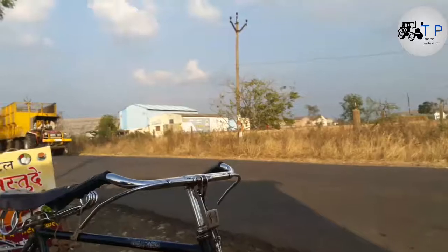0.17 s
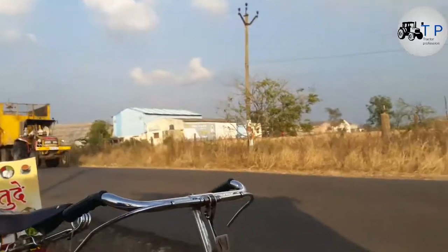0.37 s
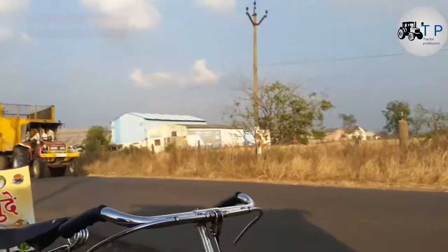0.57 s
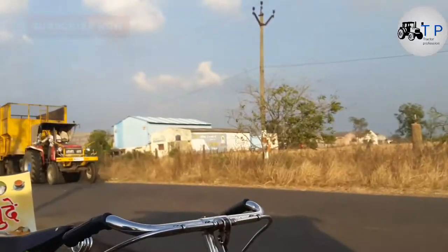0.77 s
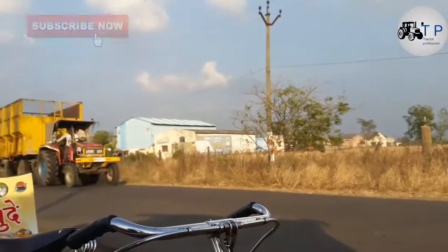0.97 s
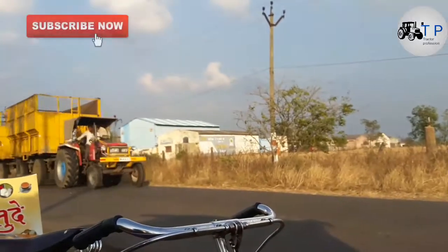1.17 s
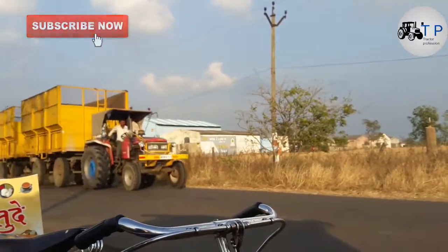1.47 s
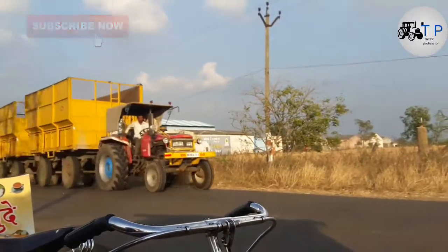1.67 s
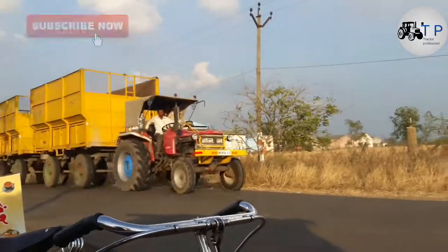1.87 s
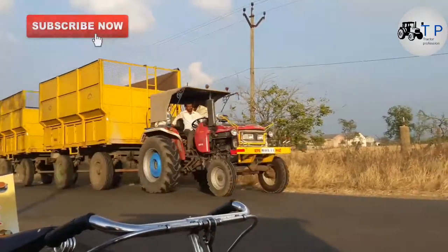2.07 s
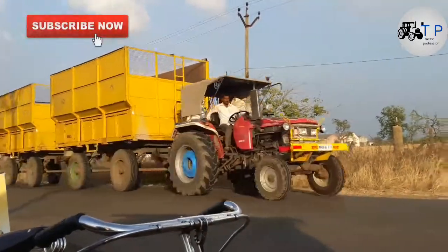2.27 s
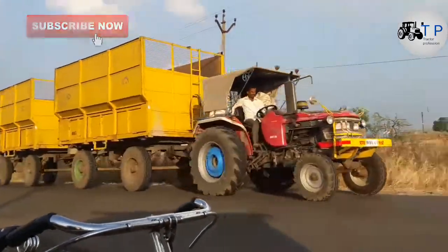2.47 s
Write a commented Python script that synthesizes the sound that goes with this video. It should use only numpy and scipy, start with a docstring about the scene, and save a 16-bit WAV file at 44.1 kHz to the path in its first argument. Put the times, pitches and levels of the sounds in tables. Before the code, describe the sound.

A tractor hauls trailers closer along a paved road, engine and tyres growing louder. A small puttering engine fades out first; a distant horn and a few sharp engine knocks follow, while wind puffs against the roadside microphone.

```python
"""Tractor approaching on a paved road

A diesel tractor hauls heavy trailers closer: rumble, tyre roar, rasp and hiss chug with its firings,
swelling and brightening over exhaust harmonics and a gear whine. A small single-cylinder engine
putters away, valves ticking. Sharp engine knocks ring a metal part, a horn sounds farther off and wind
puffs on the two ports of a roadside microphone. It all fades in after a short silence."""
import sys
import numpy as np
from scipy import signal
from scipy.io import wavfile
from scipy.ndimage import uniform_filter1d

SR = 44100
rng = np.random.default_rng(int(sys.argv[2]) if len(sys.argv) > 2 else 0)


def log_audio(samples):
    """Write samples as a 16-bit WAV file to the path given in sys.argv[1]."""
    # one column per channel
    frames = np.atleast_2d(samples).T
    # limit to full scale, then quantise
    limited = np.clip(frames, -1, 1)
    pcm = np.round(limited * 32767).astype(np.int16)
    wavfile.write(sys.argv[1], SR, pcm)


N = 115542

# Faders for the tractor's approach: time_s, rumble_db, roar_db, rasp_db, hiss_db
APPROACH = [(.25, -23, -26.5, -42.5, -42), (.45, -22.5, -27, -43.5, -43), (.62, -22.5, -26, -46, -44),
            (.8, -22, -26.5, -38, -42.5), (.95, -22, -24, -36.5, -40), (1.1, -30, -23.5, -33.5, -38.5),
            (1.25, -21.5, -22.5, -31, -38.5), (1.4, -23, -22.5, -31, -38), (1.55, -23.5, -20.5, -29, -36.5),
            (1.7, -21.5, -22, -29, -37), (1.82, -21.5, -20, -29.5, -37), (1.95, -19, -21, -30, -37.5),
            (2.05, -23, -19.5, -30, -35.5), (2.18, -18.5, -19.5, -27.5, -37),
            (2.32, -19.5, -20, -28.5, -35.5), (2.47, -22, -20, -29, -35), (2.62, -22.5, -19, -31.5, -35.5)]
# EQ curves of its four noise beds (the roar is tyres and engine casing): frequency_hz, gain_db
RUMBLE_EQ = [(15, -56), (25, -42), (48, -15), (60, -6.5), (91, -3), (119, 3), (246, 1), (275, -3),
             (340, -8.5), (450, -12.5), (700, -36), (1500, -120)]
ROAR_EQ = [(210, -26), (350, -8), (450, -4), (626, -2), (860, -1), (910, -6), (980, -5.5), (1050, -6),
           (1190, -2.5), (1420, -4), (1860, -3), (2250, -5), (2660, -5), (3300, -16), (4290, -48),
           (7260, -120)]
RASP_EQ = [(1760, -43), (3000, -1.5), (3280, -1.5), (3590, 0.5), (4310, -6.5), (4980, -7.5), (6300, -16),
           (8190, -23), (13900, -120)]
HISS_EQ = [(3530, -7), (6000, -1), (6980, -3), (8060, 0), (9420, -9.5), (12400, -8.5), (14800, -13.5),
           (15400, -15), (15600, -26)]
# Resonances of the engine casing: pitch_hz, width_hz, gain_db
CASING_MODES = [(1050, 50, -4), (1135, 60, 0), (1200, 60, -.5), (1270, 50, -4), (1575, 60, -6),
                (1830, 90, -5), (1910, 70, -6), (2080, 40, -6), (2700, 50, -7)]
# Casing ring against the roar, rising as the engine nears: time_s, gain_db
CASING_FADER = [(.5, -18), (1.3, -8), (2.1, -6.5), (2.6, -6)]
# Engine tones (exhaust harmonics of the crank, plus one gear whine near 450 Hz),
# before they ride the rumble fader: crank_multiple, level_db
ENGINE_TONES = [(2, -41), (4, -33.5), (5, -39), (6, -36.5), (9, -37.5), (10, -37), (14.3, -43.5), (18, -46),
                (20, -52), (22, -41), (36, -43.5)]
# The small engine driving away: time_s, gain_db
SMALL_FADER = [(.12, 0), (.33, 1), (.5, -1.5), (.7, -3.5), (.95, -9), (1.2, -26)]
# Tone of its exhaust pipe: frequency_hz, gain_db
SMALL_PIPE_EQ = [(30, -35), (70, -21), (110, 2), (180, -3), (350, 2.5), (500, -2), (750, -15), (1000, -12)]
# Resonances of its valves: pitch_hz, width_hz, gain_db
VALVE_MODES = [(4070, 870, 5), (4720, 1200, 6), (5500, 800, -3), (6640, 530, -4), (7540, 590, -3.5),
               (10700, 2200, -5)]
# Its loudest valve ticks: start_s, level_db, pitch_hz
VALVE_ACCENTS = [(.183, -33, 6000), (.2104, -34, 4800), (.2673, -32, 6700), (.2937, -34, 6700),
                 (.349, -35, 7000), (.3795, -31, 7600), (.406, -31, 7700), (.4334, -32, 7500),
                 (.4888, -32, 5300), (.5174, -34, 5200), (.5447, -35, 7700), (.6, -35, 6600)]
# Sharp engine knocks: start_s, strength_db
KNOCK_HITS = [(.7916, -33), (.9679, -31), (1.0494, -35), (1.4149, -32), (1.6077, -34), (1.625, -29),
              (1.6404, -33), (2.281, -32), (2.435, -32)]
# The small metal part they ring: pitch_hz, width_hz, gain_db
KNOCK_MODES = [(8370, 300, 11.5), (6600, 800, -32)]
# Faders for the horn's overtones: time_s, lower_db, upper_db
HORN_FADERS = [(.95, -37.5, -43), (1.005, -29, -41), (1.095, -29, -40.5), (1.125, -38, -34),
               (1.17, -36, -37), (1.23, -38, -47), (1.28, -35.5, -41), (1.4, -35, -36), (1.45, -39, -37),
               (1.53, -41, -43), (1.585, -39, -34), (1.63, -31, -29.5), (1.675, -34, -38)]
# Bell-shaped wind puffs: centre_s, level_db, width_s
WIND_PUFFS = [(1.018, -31, 0.044), (1.718, -27, 0.023), (2.11, -30, 0.019), (2.38, -27, 0.021),
              (2.456, -23, 0.027), (2.61, -27, 0.024)]
# Colour difference between the microphone ports: frequency_hz, left_minus_right_db
PORT_BALANCE = [(60, 2), (300, 1), (2000, -0.5), (3200, -1), (4300, -4.5), (5200, -7), (6300, -1),
                (7600, 0.5), (8800, 7), (11500, 9.5), (12700, 3), (15000, 7)]
# Phase difference between the ports: frequency_hz, left_lag_rad
PORT_PHASE_LAG = [(100, 0), (4200, 0), (6000, -1.8), (15000, -1.6)]
# Base left-right likeness of the noise beds: frequency_hz, likeness_ratio
PORT_LIKENESS = [(60, 0.99), (250, 1), (600, 0.87), (1500, 0.53), (2600, 0.31), (4500, 0.56), (7000, 0.27),
                 (9000, .15), (15000, 0.091)]

CRANK_HZ, SMALL_FIRING_HZ = 31.53, 35.64
LAG_START_SAMPLES, LAG_SAMPLES_PER_S = -10.2, 4.9  # left behind right, as the tractor crosses


def amp(db):
    """Decibels to linear gain."""
    return 10 ** (np.asarray(db) / 20)


def unit_rms(x):
    """Normalises to an rms of 1."""
    return x / np.sqrt(np.mean(x ** 2) + 1e-20)


def at_hz(points, hz):
    """Reads a curve along a log-frequency axis."""
    frequencies, values = np.transpose(points)
    return np.interp(np.log(hz + 1), np.log(frequencies + 1), values)


def fader(table, t, column=1):
    """Linear gain gliding between timed decibel points."""
    points = np.array(table)
    return amp(np.interp(t, points[:, 0], points[:, column]))


def drift(rate_hz):
    """Random wander of rms 1."""
    return unit_rms(np.interp(np.arange(N) / SR * rate_hz, np.arange(200), rng.standard_normal(200)))


def ring(x, modes):
    """Plays x through parallel resonators."""
    return sum(amp(db) * signal.lfilter(*signal.iirpeak(hz, hz / width, SR), x)
               for hz, width, db in modes)


def firings(rate_hz, first_s, decay_s, spread_db):
    """One decaying envelope per firing, each of uneven strength."""
    cycles = (np.arange(N) / SR - first_s) * rate_hz + 1
    strength = amp(spread_db * rng.standard_normal(400))[cycles.astype(int)]
    return strength * np.exp(-(cycles % 1) / rate_hz / decay_s)


def mic_ports(left, right, hz, lag_samples, tilt_db=0.):
    """Two spectrograms to stereo: direction delays one side, and each port has its own colour."""
    treble_tilt = tilt_db * np.clip(hz / 9000, 0, 1) ** 2  # cuts the left, lifts the right
    balance = amp(at_hz(PORT_BALANCE, hz) / 2 - treble_tilt)[:, None]
    phase = 2 * np.pi * hz[:, None] * lag_samples / SR + at_hz(PORT_PHASE_LAG, hz)[:, None]
    pair = np.array([left * balance * np.exp(-1j * phase), right / balance])
    return signal.istft(pair, nperseg=512, noverlap=384)[1][:, :N]


def pan(x, tilt_db=0., lag_samples=None):
    """Places a point source, by default on the tractor; reflections make its stereo phase wander."""
    hz, t, spectrogram = signal.stft(x, SR, nperseg=512, noverlap=384)
    wander_rad = .5 * np.interp(t * SR, np.arange(N), drift(6.2))
    if lag_samples is None:
        lag_samples = LAG_START_SAMPLES + LAG_SAMPLES_PER_S * t
    return mic_ports(spectrogram * np.exp(1j * wander_rad), spectrogram, hz, lag_samples, tilt_db)


def noise_bed(patchy_db, eq=None, modes=()):
    """Patchy noise shaped by an EQ or by resonances; the sides grow alike as the tractor nears."""
    frames, hz = N // 128 + 5, np.fft.rfftfreq(512, 1 / SR)
    t = np.arange(frames) * 128 / SR
    re_left, im_left, re_other, im_other, patches = rng.standard_normal((frames, 257, 5)).T
    patches = uniform_filter1d(uniform_filter1d(patches, 6, 0), 20, 1)
    gain = amp(patchy_db * unit_rms(patches))
    likeness = np.clip(at_hz(PORT_LIKENESS, hz), 0, 1)[:, None] ** (1.55 - .48 * t)
    left = re_left + 1j * im_left
    right = likeness * left + np.sqrt(1 - likeness ** 2) * (re_other + 1j * im_other)
    bed = mic_ports(left * gain, right * gain, hz, LAG_START_SAMPLES + LAG_SAMPLES_PER_S * t)
    bins_hz = np.fft.rfftfreq(N, 1 / SR)
    if modes:
        colour = sum(amp(db) / (1 + ((bins_hz - pitch) / width * 2) ** 2) for pitch, width, db in modes)
    else:
        colour = amp(at_hz(eq, bins_hz))
    bed = np.fft.irfft(np.fft.rfft(bed) * colour, N)
    return bed / np.sqrt(np.mean(bed.mean(0) ** 2))


def tractor(t):
    """Noise beds chug at two firings a turn, over exhaust harmonics of the crank and a gear whine."""
    chug = unit_rms(firings(2 * CRANK_HZ, first_s=.0095, decay_s=.005, spread_db=5.))
    rumble_gain, roar_gain, rasp_gain, hiss_gain = (fader(APPROACH, t, k) for k in range(1, 5))
    turns = np.cumsum(CRANK_HZ * (1 + .002884 * drift(3.97))) / SR
    tones = sum(amp(db + 4.5 * drift(9.27)) * np.sin(2 * np.pi * (k * turns + rng.random()))
                for k, db in ENGINE_TONES)
    rumble = noise_bed(patchy_db=-1., eq=RUMBLE_EQ)
    roar = noise_bed(patchy_db=.74, eq=ROAR_EQ)
    casing = fader(CASING_FADER, t) * noise_bed(patchy_db=1.9, modes=CASING_MODES)
    rasp = noise_bed(patchy_db=2., eq=RASP_EQ)
    hiss = noise_bed(patchy_db=1.5, eq=HISS_EQ)
    return (rumble_gain * (.84 + .1 * chug) * rumble
            + roar_gain * (.85 + .1 * chug) * (roar + casing)
            + rasp_gain * (.85 + .1 * chug) * rasp
            + hiss_gain * (.91 + .25 * chug) * hiss
            + pan(np.sqrt(2) * tones * rumble_gain / rumble_gain.mean()))


def small_engine(t):
    """One cylinder putters off: exhaust beats, a valve tick on each firing and an even clatter."""
    first_s, accent_decay_s = .018, .0025
    cycles = SMALL_FIRING_HZ * (t - first_s)
    putter = 0
    for k in range(1, 28):
        gain = amp(at_hz(SMALL_PIPE_EQ, k * SMALL_FIRING_HZ) + 3.6 * drift(13.8))
        putter += gain * np.cos(2 * np.pi * k * cycles - .15 * k * k)  # staggered phases smear the beat
    bursts = firings(SMALL_FIRING_HZ, first_s, decay_s=.0023, spread_db=1.5)
    ticks = unit_rms(ring(bursts * rng.standard_normal(N), VALVE_MODES))
    clatter = unit_rms(ring(rng.standard_normal(N), VALVE_MODES))
    engine = amp(-27) * unit_rms(putter) + amp(-45) * ticks + amp(-42) * clatter
    accents = 0
    for start_s, db, hz in VALVE_ACCENTS:
        age = t - start_s
        accents += (age > 0) * amp(db) * np.exp(-abs(age) / accent_decay_s) * np.sin(2 * np.pi * hz * age)
    return pan(engine * fader(SMALL_FADER, t) + accents, tilt_db=10.5, lag_samples=9.5)


def swell(t, centre_s, width_s):
    """Bell-shaped envelope peaking at 1."""
    return np.exp(-.5 * ((t - centre_s) / width_s) ** 2)


def knocks(t):
    """Single clicks ring a small metal part, which squeaks once."""
    clicks = np.zeros(N)
    for start_s, db in KNOCK_HITS:
        clicks[round(start_s * SR)] = 20 * amp(db)
    squeak_hz, width_hz = 8150, 200
    squeak = unit_rms(ring(rng.standard_normal(N), [(squeak_hz, width_hz, 0)]))
    squeak *= amp(-37) * swell(t, centre_s=1.62, width_s=.022)
    return pan(ring(clicks, KNOCK_MODES) + squeak)


def horn(t):
    """A far horn: only two rough overtones cut through the roar."""
    overtones_hz, roughness_hz = (3000, 3432), 45
    tone = 0
    for column, hz in enumerate(overtones_hz, start=1):
        buzz = 1 + .35 * drift(roughness_hz)
        cycles = hz * t + .13 * drift(roughness_hz)
        tone += np.sqrt(2) * fader(HORN_FADERS, t, column) * buzz * np.sin(2 * np.pi * cycles)
    gate = 1. * (t > HORN_FADERS[0][0]) * (t < HORN_FADERS[-1][0])
    return pan(tone * uniform_filter1d(gate, 400), lag_samples=-1.5)


def wind(t):
    """Low, lumpy puffs on the ports, weaker and in opposite polarity on the right."""
    band = signal.butter(2, [60, 290], "bandpass", fs=SR)
    buffet = unit_rms(signal.lfilter(*band, rng.standard_normal(N)))
    puffs = sum(amp(db) * swell(t, centre_s, width_s) for centre_s, db, width_s in WIND_PUFFS)
    return buffet * puffs * [[1.], [-.6]]


def scene():
    """The stereo roadside mix."""
    t = np.arange(N) / SR
    return tractor(t) + small_engine(t) + knocks(t) + horn(t) + wind(t)


def record(dry):
    """A short silence, a quick fade-in and a steep high cut."""
    t = np.arange(N) / SR
    start_s, fade_s, cutoff_hz = .13, .11, 15300
    fade = (t > start_s) * np.clip(.096 + (t - start_s) / fade_s, 0, 1)
    high_cut = signal.firwin(511, cutoff_hz, window=("kaiser", 9), fs=SR)
    return signal.oaconvolve(dry * fade, high_cut[None], "same")


dry = scene()
out = record(dry)
log_audio(out)
```